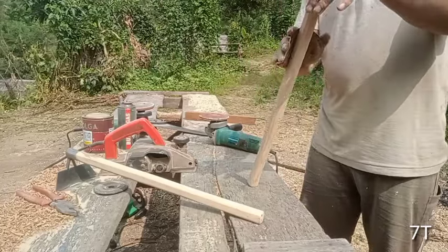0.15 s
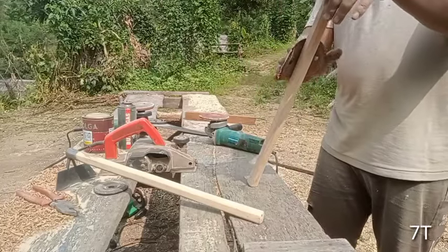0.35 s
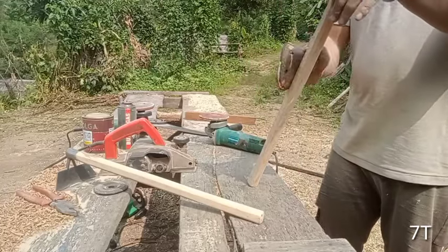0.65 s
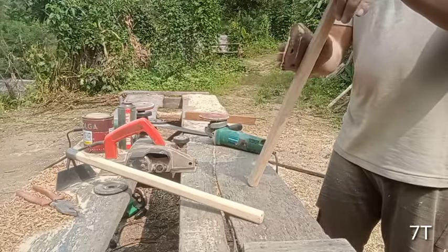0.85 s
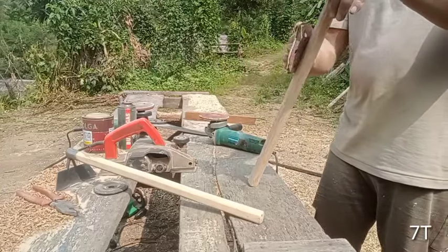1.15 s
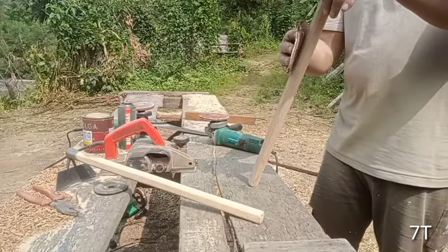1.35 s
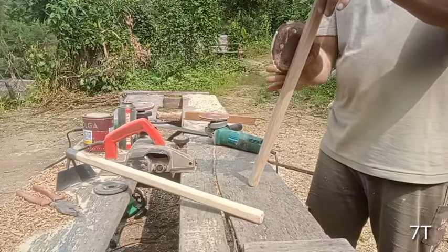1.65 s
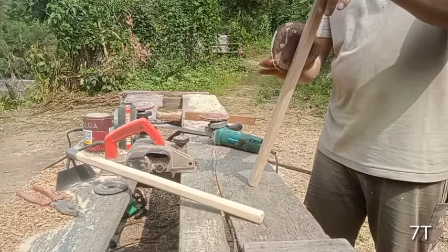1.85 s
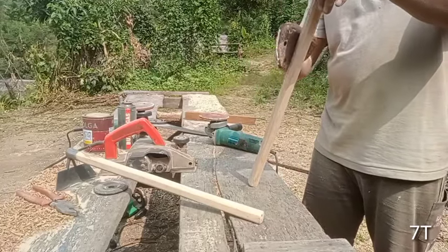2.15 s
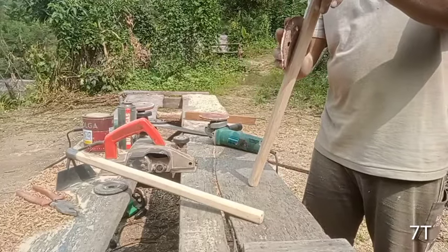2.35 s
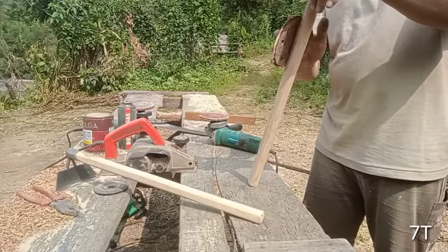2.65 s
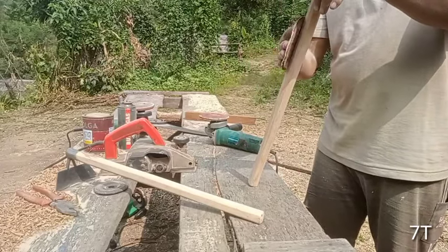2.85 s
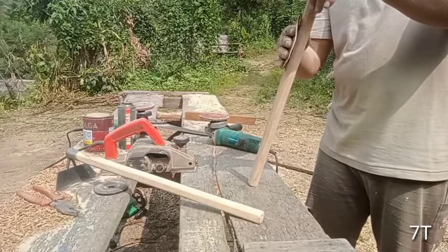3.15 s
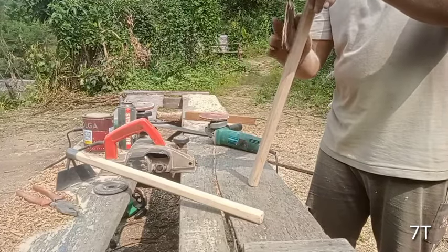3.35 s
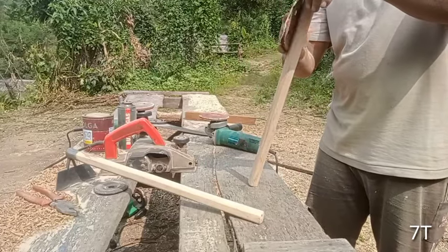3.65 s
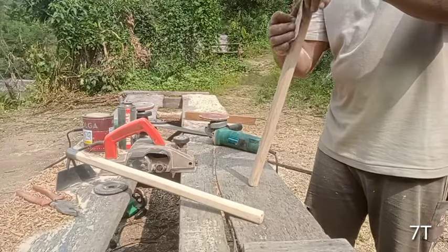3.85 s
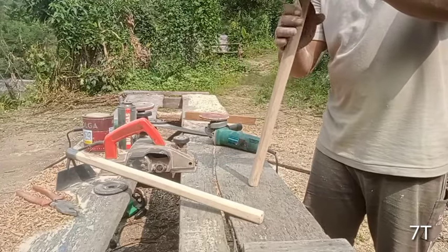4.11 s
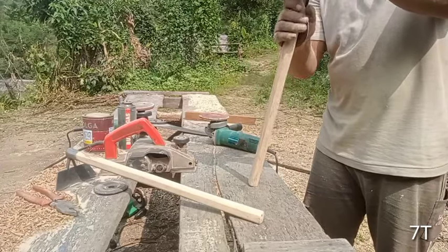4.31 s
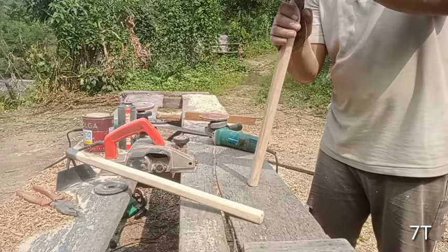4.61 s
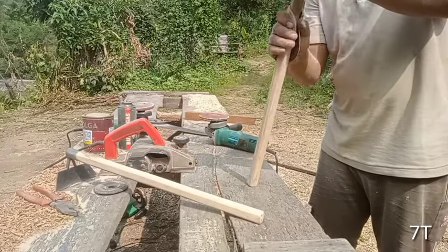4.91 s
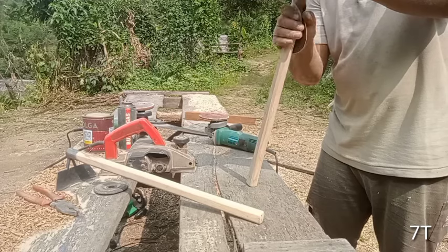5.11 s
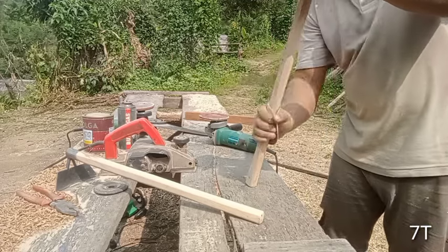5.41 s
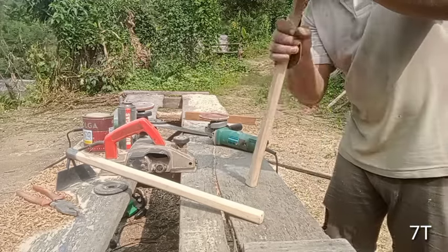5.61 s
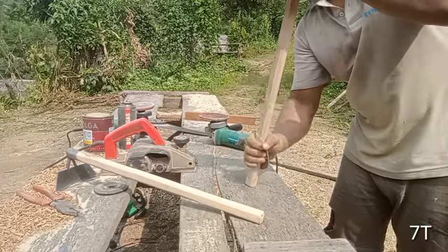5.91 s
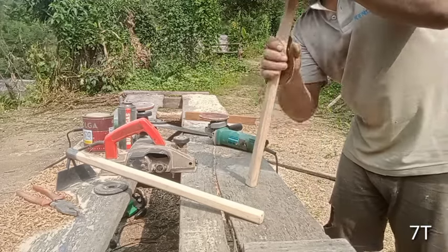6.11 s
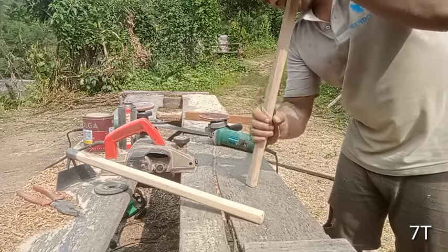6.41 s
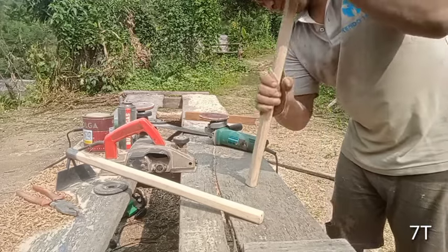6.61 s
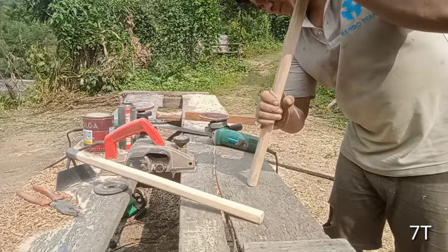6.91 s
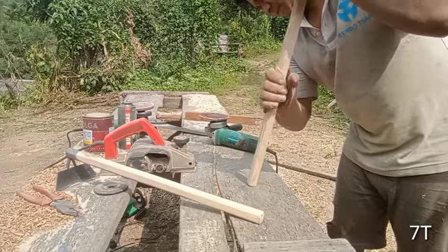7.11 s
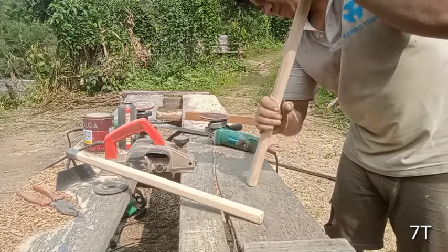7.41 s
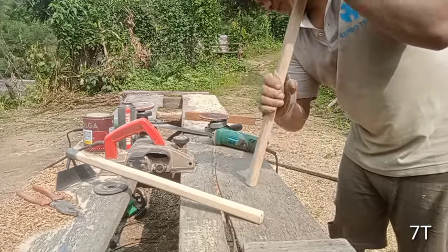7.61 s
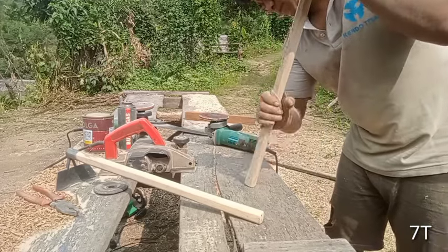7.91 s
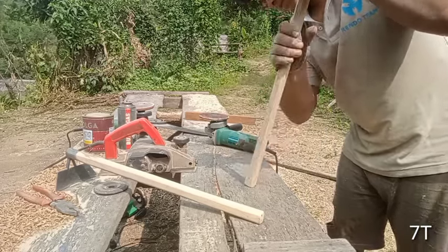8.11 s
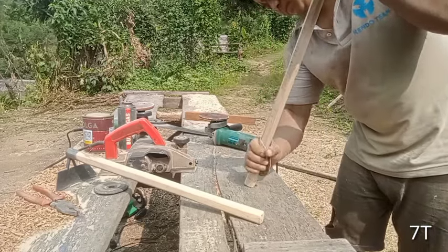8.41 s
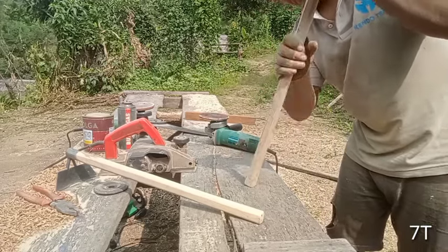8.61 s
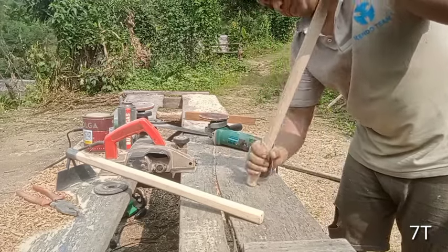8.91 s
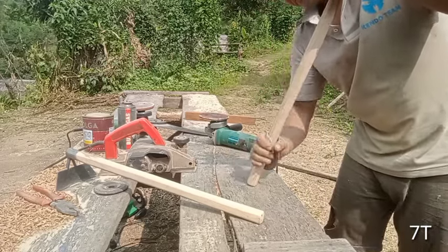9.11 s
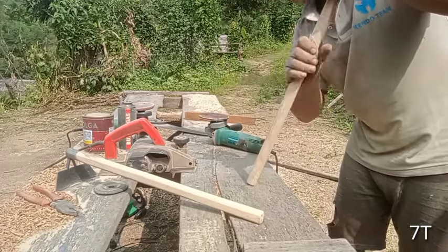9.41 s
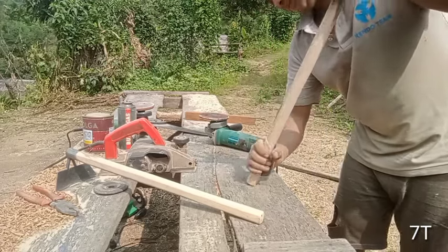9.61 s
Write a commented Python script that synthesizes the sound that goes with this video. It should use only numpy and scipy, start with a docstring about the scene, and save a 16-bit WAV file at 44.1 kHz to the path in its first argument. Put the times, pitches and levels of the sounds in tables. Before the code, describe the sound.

Close by at a quiet outdoor workbench, folded sandpaper ticks and rustles, and a wooden handle knocks on the planks a few times. Then hand sanding takes over: gritty, rhythmic strokes, about four a second, with a low hum from the wood. The handle thumps the bench once, hard, as the strokes slow slightly. Early on, a far insect and bird are barely audible.

```python
"""A wooden handle stands on an outdoor plank bench and is sanded by hand. First the folded sandpaper
snaps, slides and crackles, with a faint breathy hiss, while a far insect trills. Knocks set the planks
and, faintly, a metal tool ringing, and a distant bird slurs a few notes. From about five seconds,
rasping strokes run down and up the handle: grit tears at the fibres and the drag makes the wood hum.
The last knocks fall among the early strokes; later the handle thumps the bench once, hard."""
import sys
import numpy as np
from scipy import signal
from scipy.fft import rfft, irfft
from scipy.io import wavfile
from scipy.ndimage import map_coordinates

SR = 44100
rng = np.random.default_rng(int(sys.argv[2]) if len(sys.argv) > 2 else 0)


def log_audio(samples):
    """Write samples as a 16-bit WAV file to the path given in sys.argv[1]."""
    # one column per channel
    frames = np.atleast_2d(samples).T
    # limit to full scale, then quantise
    limited = np.clip(frames, -1, 1)
    pcm = np.round(limited * 32767).astype(np.int16)
    wavfile.write(sys.argv[1], SR, pcm)


N = 429975
TIME = np.arange(N) / SR
AGE = TIME[:SR * 3 // 4]   # seconds since a blow

# resonances of the cupped sandpaper: pitch_hz, width_hz, level_db
PAPER_RESONANCES = [(1973, 950, -7), (2750, 687, 0.5), (3540, 926, -2.5), (5390, 3600, -17)]
# resonances of the rubbed handle and bench: pitch_hz, width_hz, level_db
WOOD_RESONANCES = [(90, 16, -9), (129, 22, -2.5), (180.7, 50, 1.5), (225, 34.6, 4), (276, 23.6, -1.5),
                   (425, 33, -1), (475.4, 19.6, 4), (541.4, 24.8, 1), (673, 30.6, -2), (753, 25.5, -2),
                   (832, 90, -4.5), (1102, 81, -9), (1228, 26, -5), (1450, 800, -30)]
# spectrum of a bright snap: frequency_hz, level_db
SNAP_SPECTRUM = [(200, -12), (950, -34), (1700, 7), (3300, 8.5), (6000, -8), (9300, -3), (15500, -23.5)]
# spectrum of a dull tap on wood: frequency_hz, level_db
TAP_SPECTRUM = [(60, -3), (210, 2.5), (340, 0), (480, 2.5), (750, -0.5), (1300, -5.5), (3000, -8),
                (15500, -79)]
# small slides of the paper, and a faint breathy hiss at about one second:
# start_s, length_s, fastest_fraction, rasp_db, hiss_relative_db, hum_db, rasp_centre_hz
FAINT_RUSTLES = [(0.055, .15, 0.68, -57, -7, -66, 2097), (0.362, .16, 0.22, -50, -14, -55.5, 2053),
                 (0.551, 0.058, 0.3, -54.5, -12, -56.5, 2303), (0.80, 0.11, 0.1, -70, -12, -68, 2401),
                 (0.923, .46, 0.16, -63, -0.5, -65.5, 2898), (1.448, .33, 0.48, -64.5, -6, -67, 2999),
                 (1.972, .22, 0.72, -62.5, -9, -66, 2799), (2.468, 0.13, .7, -64, -2.5, -60.5, 2801),
                 (3.086, 0.067, 0.46, -55, -13, -60.5, 2700), (3.311, 0.21, 0.43, -57, -7.5, -52.5, 2901),
                 (3.555, 0.079, 0.7, -56.5, -7, -53.5, 2900), (3.725, .17, 0.2, -62, -5, -59, 2904),
                 (4.158, 0.14, 0.6, -48.5, -5, -48.5, 3090), (4.29, 0.12, 0.18, -50.5, -8, -52, 3003),
                 (4.603, 0.12, 0.7, -47, -14, -50, 2698), (4.765, .165, 0.42, -43.5, -12, -45, 2715)]
# sanding strokes, down and up in turn: same columns as FAINT_RUSTLES
SANDING_STROKES = [(4.958, 0.18, 0.81, -31.5, -10.0, -40, 2746),
                   (5.155, 0.14, 0.57, -27.0, -11.5, -40, 2585),
                   (5.322, 0.19, 0.73, -18.5, -7.0, -34, 2956), (5.58, 0.18, 0.39, -22, -7.0, -37.5, 3046),
                   (5.784, 0.18, 0.79, -18.5, -7.5, -32.5, 3034), (6.04, 0.18, 0.44, -22, -6.0, -37, 3000),
                   (6.232, 0.19, 0.74, -19.5, -7, -35, 2993), (6.481, 0.2, 0.39, -22.5, -6.5, -36.5, 2974),
                   (6.692, 0.2, 0.77, -20, -7.5, -34, 3023), (6.955, 0.23, 0.45, -22.0, -7, -38, 3040.0),
                   (7.186, 0.21, 0.64, -21.0, -5, -36, 3000.0),
                   (7.464, 0.22, 0.36, -23.5, -7.0, -39.5, 2920.0),
                   (7.681, 0.19, 0.75, -21, -6.5, -35.5, 3008), (7.93, 0.27, 0.4, -23.5, -4.5, -39.5, 2927),
                   (8.201, 0.28, 0.4, -23.5, -7.0, -34, 2865), (8.551, 0.26, 0.45, -24, -4.5, -39, 2910),
                   (8.825, 0.32, 0.28, -25.5, -6, -36.5, 2838), (9.2, 0.31, 0.45, -26.5, -6.5, -43.5, 3145),
                   (9.493, 0.26, 0.64, -23, -5.0, -37, 2980)]


def from_db(db):
    """Decibels to gain."""
    return 10 ** (np.asarray(db) / 20)


def rms_one(x):
    """Scale to an rms of 1."""
    return x / np.sqrt(np.mean(x ** 2) + 1e-20)


def add(track, start_s, sound):
    """Mix a sound into the track."""
    start = round(start_s * SR)
    track[start:start + len(sound)] += sound[:N - start]


def at_hz(points, hz):
    """Read a curve along a logarithmic frequency axis."""
    point_hz, value = np.transpose(points)
    return np.interp(np.log(np.maximum(hz, 1)), np.log(point_hz), value)


def noise(spectrum, size):
    """Noise of a given colour; rms 1."""
    hz = np.arange(size // 2 + 1) * SR / size
    white = rfft(rng.standard_normal(size))
    return rms_one(irfft(white * from_db(at_hz(spectrum, hz)), size))


def drift(rate_hz):
    """A wandering control that glides between random values; rms 1."""
    return rms_one(np.interp(TIME * rate_hz, np.arange(N // 10), rng.standard_normal(N // 10)))


def soften(x, hz):
    """Two-pole low-pass."""
    return signal.sosfilt(signal.butter(2, hz, fs=SR, output="sos"), x)


def band(x, low_hz, high_hz):
    """Band-pass; rms 1."""
    return rms_one(signal.sosfilt(signal.butter(2, [low_hz, high_hz], "band", fs=SR, output="sos"), x))


def resonate(x, peaks):
    """Parallel resonances with alternating signs; rms 1."""
    out = 0
    for k, (hz, width_hz, db) in enumerate(peaks):
        radius = np.exp(-np.pi * width_hz / SR)
        poles = [1, -(1 + radius ** 2) * np.cos(2 * np.pi * hz / SR), radius ** 2]
        out += (-1) ** k * from_db(db) * (1 - radius ** 2) * signal.lfilter([1, 0, -1], poles, x)
    return rms_one(out)


def ring(modes, scatter_db):
    """Decaying sines; every blow shares its force out a little differently."""
    hz, db, t60_s = np.transpose(modes)[:, :, None]
    db = db + scatter_db * rng.standard_normal(db.shape)
    sign = (-1) ** np.arange(len(modes))[:, None]
    return np.sum(sign * from_db(db - 60 * AGE / t60_s) * np.sin(2 * np.pi * hz * AGE), axis=0)


def burst(spectrum, t60_s):
    """A contact heard through densely packed modes that die together."""
    return noise(spectrum, len(AGE)) * from_db(-60 * AGE / t60_s)


def grit(per_s, spread_db):
    """Random clicks of uneven size, as when grains catch and tear fibres."""
    sizes = from_db(spread_db * np.minimum(rng.exponential(1, N), 4))
    return (rng.random(N) < per_s / SR) * sizes * rng.choice([-1, 1], N)


def outdoor_air():
    """A quiet bed of still air whose level barely wavers."""
    # colour of the air: frequency_hz, level_db
    air_spectrum = [(25, -21.5), (50, -4), (90, 5.5), (180, 3), (330, -2), (650, -4), (1400, -10),
                    (2700, -3.5), (4500, -9.5), (6000, -21.5), (9500, -17.5), (15500, -43)]
    return from_db(-64.5 + 0.35 * drift(rate_hz=14)) * noise(air_spectrum, N)


def insect():
    """A far insect's wing strokes pulse a narrow, high resonance."""
    # trills: middle_s, length_s
    trills = [(0.33, .16), (0.516, .16), (1.239, 0.31), (2.289, 0.083), (3.521, 0.3), (4.39, 0.1)]
    wing_strokes = np.sin(np.pi * 25 * TIME) ** 2   # 25 a second
    buzz = resonate(rng.standard_normal(N), [(6500, 90, 0)]) * wing_strokes
    swells = sum(np.exp(-(2 * (TIME - middle_s) / length_s) ** 4) for middle_s, length_s in trills)
    return from_db(-76) * buzz * swells


def bird():
    """A far bird's notes glide, with a strong second harmonic."""
    # slurred notes: start_s, length_s, start_hz, end_hz, level_db
    notes = [(3.15, 0.059, 2000, 1860, -63), (3.383, .09, 1880, 1820, -64), (3.768, 0.076, 2150, 2030, -61),
             (3.82, 0.09, 2110, 2690, -59), (3.972, 0.065, 2600, 2100, -65)]
    out = np.zeros(N)
    for start_s, length_s, start_hz, end_hz, db in notes:
        hz = np.linspace(start_hz, end_hz, round(length_s * SR))
        phase = 2 * np.pi * np.cumsum(hz) / SR
        voice = np.sin(phase) + np.sin(2 * phase)
        flutter = drift(rate_hz=420)[:len(hz)]   # scattered by the foliage on its way
        add(out, start_s, from_db(db) * flutter * np.hanning(len(hz)) * voice)
    return out


def paper_crackle():
    """During the faint rustles, the paper's folds give way in small ticks and fingers bump the wood."""
    flexing, nudging = np.zeros((2, N))
    for start_s, length_s, fastest, rasp_db, _, hum_db, _ in FAINT_RUSTLES:
        speed = hand_speed(length_s, fastest)
        add(flexing, start_s, from_db(rasp_db) * speed)
        add(nudging, start_s, from_db(hum_db) * speed)
    ticks = from_db(-7) * resonate(grit(per_s=100, spread_db=0.5), PAPER_RESONANCES)
    bumps = from_db(-0.5) * band(resonate(grit(per_s=35, spread_db=2.5), WOOD_RESONANCES), 150, 670)
    return flexing * ticks + nudging * bumps


def paper_snaps():
    """The stiff paper buckles with a sharp tick and a short rustle, and nudges the handle."""
    # paper snaps and finger taps: start_s, level_db, wood_trim_db
    snaps = [(0.022, -29.5, 0), (0.082, -32.5, -16), (0.281, -42.5, -1), (0.450, -54, 8), (0.587, -46, 10),
             (0.7004, -19, -2), (0.707, -37, -14), (0.819, -32.5, -11), (0.829, -33.5, -11),
             (0.974, -28.5, 13), (0.983, -34.5, 13.5), (0.991, -22, -12), (1.003, -20.5, -17),
             (1.011, -23, -17), (1.557, -53, 11), (1.793, -52.5, 12), (2.112, -37, 2.5),
             (2.580, -28.5, -6.5), (3.575, -35.5, 5), (3.773, -29.5, -6), (4.019, -26.5, 3),
             (4.185, -21.5, -26), (4.209, -23, -12), (4.221, -14, -21), (4.245, -23, -25),
             (4.807, -24.5, -19), (4.824, -22.5, 3.5), (5.935, -13.5, 2)]
    out = np.zeros(N)
    for start_s, db, wood_trim_db in snaps:
        tick = from_db(-8) * burst(SNAP_SPECTRUM, t60_s=0.0079)
        rustle = from_db(-19) * burst(SNAP_SPECTRUM, t60_s=0.066)
        wood = from_db(wood_trim_db - 15) * burst(TAP_SPECTRUM, t60_s=0.1)
        add(out, start_s, from_db(db) * (tick + rustle + wood))
    return out


def wood_thumps():
    """Dry, deep blows with a noisy thud; the handle wakes every mode, a soft palm only the lowest."""
    # soft bumps of the hand, and one hard wooden thump of the handle on the bench:
    # start_s, level_db, rolloff_hz
    thumps = [(4.667, -3.5, 230), (7.371, 4, 6000), (7.856, -2.5, 302.4)]
    # modes of the thumped wood: pitch_hz, level_db, t60_s
    thump_modes = [(118.16, -27.5, 0.14), (162.3, -29.5, 0.27), (218.3, -28.5, .2), (373, -33, 0.26),
                   (567, -35.5, 0.18), (755, -12.5, 0.017), (874, -18, 0.088), (993, -15, 0.024),
                   (1403, -14, 0.008), (2080, -34, 0.044), (2700, -36, .05)]
    out = np.zeros(N)
    for start_s, db, rolloff_hz in thumps:
        body = ring(thump_modes, scatter_db=0.9)
        click = from_db(-14) * burst(SNAP_SPECTRUM, t60_s=0.011)
        thud = from_db(-28) * burst(TAP_SPECTRUM, t60_s=0.16)
        add(out, start_s, from_db(db) * soften(body + click + thud, rolloff_hz))
    return out


def plank_wash(chatter_s, echo_db, echo_t60_s):
    """The planks chatter briefly, then die away, treble first; a faint echo returns from the yard."""
    # the planks' many weak modes, heard as noise: frequency_hz, level_db
    wash_spectrum = [(50, -39), (90, -16), (150, -17), (290, -11), (370, -12), (480, -3.5), (860, -8.5),
                     (1150, -3.5), (1650, -12.5), (2200, -10), (2900, -11), (4000, -29.5), (6200, -19),
                     (8800, -20), (15500, -47)]
    # their decay by band: centre_hz, t60_s
    band_decays = [(100, 0.55), (260, 0.26), (700, 0.21), (1840, 0.15), (4850, 0.12), (12800, 0.12)]
    centres_hz, t60s = np.transpose(band_decays)
    hz = np.arange(len(AGE) // 2 + 1) * SR / len(AGE)
    spectrum = rfft(noise(wash_spectrum, len(AGE)))
    decaying_s = np.maximum(AGE - chatter_s, 0)
    echo = from_db(echo_db - 60 * AGE / echo_t60_s)
    out = 0
    for share, t60_s in zip(np.eye(len(centres_hz)), t60s):
        band_noise = irfft(spectrum * at_hz(np.c_[centres_hz, share], hz), len(AGE))
        out += band_noise * (from_db(-60 * decaying_s / t60_s) + echo)
    attack = 1 - np.exp(-AGE / 0.00057)
    return out * attack


def bench_knocks():
    """Each knock is a short crack that sets planks and tool ringing; light blows are duller."""
    # blows on the bench: start_s, level_db, crack_trim_db, rolloff_hz
    knocks = [(2.373, -12, 2.5, 575), (2.821, -4.5, 2, 860), (3.250, -1.5, -1, 3240),
              (3.648, -0.5, -0.5, 3120), (4.031, 1, -1, 3400), (5.216, 1, 1, 3040),
              (6.191, -0.5, -2.5, 2980), (6.511, -0.5, 1, 2788)]
    # strong modes of the planks: pitch_hz, level_db, t60_s
    plank_modes = [(274.2, -12, 0.3), (306, -16, 0.37), (478, -3.5, 0.21), (560, -3, 0.095),
                   (588, -7.5, 0.19), (620, 6.5, 0.026), (744, 1.5, 0.18), (775, -5.5, 0.22),
                   (943, -6.5, 0.19), (1130, -9, 0.25), (1206, -10, 0.16), (1384, -10, 0.19),
                   (1396, -5.5, 0.11), (1525, -17, 0.11), (2210, -20.5, .14), (2410, -16, .12)]
    # a metal tool lying on the planks: pitch_hz, level_db, t60_s
    tool_modes = [(6660, -59.5, 0.8)]
    out = np.zeros(N)
    for start_s, db, crack_trim_db, rolloff_hz in knocks:
        body = from_db(-20) * ring(plank_modes, scatter_db=1.5)
        wash = from_db(-19) * plank_wash(chatter_s=0.017, echo_db=-29, echo_t60_s=0.61)
        crack = from_db(crack_trim_db - 23.5) * burst(SNAP_SPECTRUM, t60_s=0.13)
        tool = ring(tool_modes, scatter_db=1)
        add(out, start_s, from_db(db) * (soften(body + wash, rolloff_hz) + crack + tool))
    return out


def hand_speed(length_s, fastest):
    """One movement: from rest to full speed at the fraction `fastest` of its length, and back to rest."""
    progress = np.linspace(0, 1, round(length_s * SR))
    return np.sin(np.pi * np.interp(progress, [0, fastest, 1], [0, .5, 1]))


def hand_height():
    """The hand starts high and glides from one end of its travel to the other with every stroke."""
    low, high = .15, .77   # 0 is the foot of the handle, 1 its top
    turns_s = [stroke[0] for stroke in SANDING_STROKES] + [N / SR]
    strokes_done = np.interp(TIME, turns_s, np.arange(len(turns_s)))
    return low + (high - low) * np.cos(np.pi * strokes_done / 2) ** 2


def linger(gain, tail_db, t60_s):
    """Give a loudness contour a dying tail."""
    feedback = from_db(-60 / (t60_s * SR)) ** 2
    tail_power = signal.lfilter([1 - feedback], [1, -feedback], gain ** 2 + 1e-18)
    return np.sqrt(gain ** 2 + from_db(tail_db) ** 2 * tail_power)


def friction():
    """Envelopes of rasp, hiss and hum: the paper sticks, jolts free, then follows the hand's speed."""
    stick_s, stuck_db, jolt_s, jolt_share = .014, -5, 0.017, 0.39
    rasp, hiss, hum = np.zeros((3, N))
    events = [*FAINT_RUSTLES, *SANDING_STROKES]
    for start_s, length_s, fastest, rasp_db, hiss_relative_db, hum_db, _ in events:
        speed = hand_speed(length_s, fastest)
        free_s = TIME[:len(speed)] - stick_s
        sliding = np.where(free_s > 0, 1, from_db(stuck_db))
        jolt = (free_s > 0) * np.exp(-np.abs(free_s) / jolt_s)
        # the hiss needs speed; the wood hums at any drag
        add(rasp, start_s, from_db(rasp_db) * sliding * speed ** 1.18)
        add(hiss, start_s, from_db(rasp_db + hiss_relative_db) * sliding * speed ** 1.65)
        add(hum, start_s, from_db(hum_db) * sliding * (speed ** 0.46 + jolt_share * jolt))
    paper_tail = dict(tail_db=-18.5, t60_s=0.24)
    return linger(rasp, **paper_tail), linger(hiss, **paper_tail), linger(hum, tail_db=-4, t60_s=0.21)


def paper_rasp(grains):
    """Grains ring the cupped paper; its resonances slide with the grip and rise as the hand goes down."""
    unshifted_hz, foot_to_top_hz = 2913, 717.5
    foot_delay_s, top_extra_s = 0.00053, 0.000722
    height = hand_height()
    start_s, length_s, *_, event_hz = np.transpose([*FAINT_RUSTLES, *SANDING_STROKES])
    stroking = TIME > SANDING_STROKES[0][0]
    centre_hz = np.interp(TIME, start_s + length_s / 2, event_hz)
    centre_hz -= foot_to_top_hz * (height - .5) * stroking
    rasp = band(resonate(grains, PAPER_RESONANCES), 1520, 18000)
    rasp = map_coordinates(rasp, [np.cumsum(centre_hz / unshifted_hz)], order=3, mode="wrap")
    # the bounce off the bench combs the rasp: ripples sweep up as the hand comes down
    bounce = np.interp(TIME - foot_delay_s - top_extra_s * height, TIME, rasp)
    return rms_one(rasp + .33 * bounce)


def sanding():
    """Grit clicks sound through the paper; the slower drag of the hand shakes the wood."""
    # high resonances of the cupped sandpaper: pitch_hz, width_hz, level_db
    hiss_resonances = [(6100, 2600, -16), (9180, 1310, 1), (11900, 8800, -9.5), (15040, 2050, -9.5)]
    rasp_gain, hiss_gain, hum_gain = friction()
    grains = grit(per_s=16000, spread_db=1.5)
    rasp = paper_rasp(grains)
    dense_grains = grains + grit(per_s=25000, spread_db=1.5)
    hiss = band(resonate(dense_grains, hiss_resonances), 3200, 19000)
    # the paper sticks and slips, so all grains surge together
    surge_db = 0.57 * drift(rate_hz=22) + 1.05 * drift(rate_hz=50) + 1.026 * drift(rate_hz=540)
    paper = from_db(surge_db) * (rasp_gain * rasp + hiss_gain * hiss)
    # the drag comes in uneven tugs, each left to ring in the wood
    tugs = grit(per_s=2500, spread_db=2) * from_db(1.94 * drift(rate_hz=45))
    hum = band(resonate(tugs, WOOD_RESONANCES), 76, 2000)
    return paper + hum_gain * hum


def scene():
    """All work happens at the bench, in quiet open air; both channels are alike."""
    air = outdoor_air()
    work = sanding() + paper_crackle() + bench_knocks() + paper_snaps() + wood_thumps()
    return np.tile(air + work + insect() + bird(), (2, 1))


def record(dry):
    """The microphone sheds deep bass, rounds the highest peaks and cuts the top."""
    low_cut_hz, high_cut_hz = 55, 15900
    thin = signal.sosfilt(signal.butter(2, low_cut_hz, "high", fs=SR, output="sos"), dry)
    rounded = np.tanh(thin)
    return signal.sosfilt(signal.ellip(10, .2, 80, high_cut_hz, fs=SR, output="sos"), rounded)


dry = scene()
out = record(dry)
log_audio(out)
```